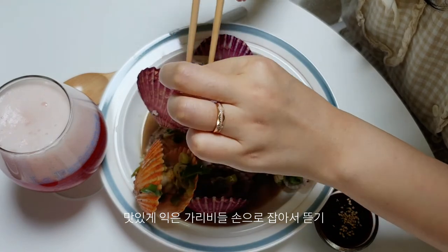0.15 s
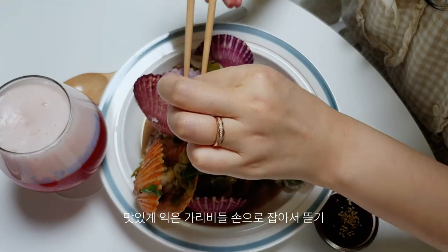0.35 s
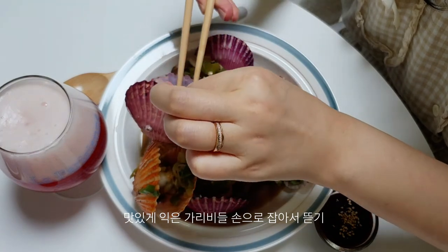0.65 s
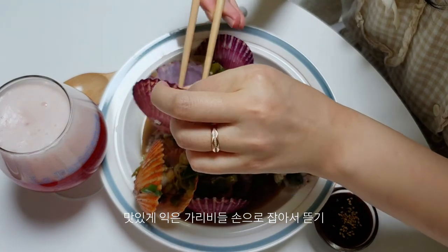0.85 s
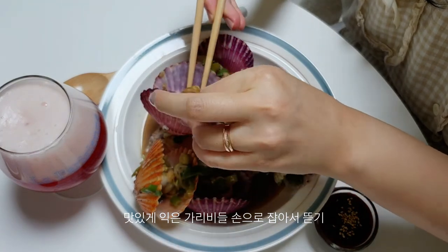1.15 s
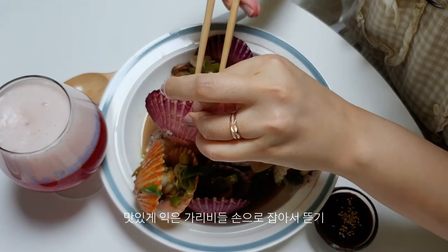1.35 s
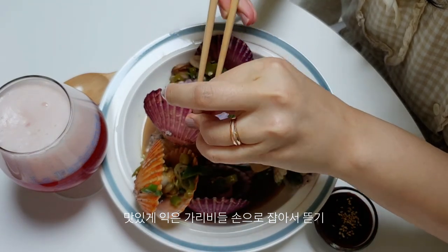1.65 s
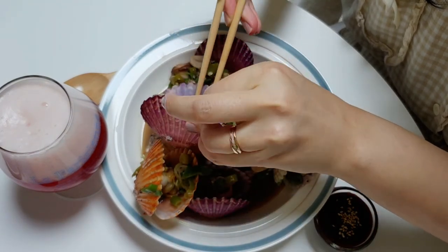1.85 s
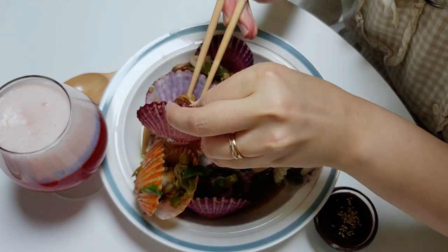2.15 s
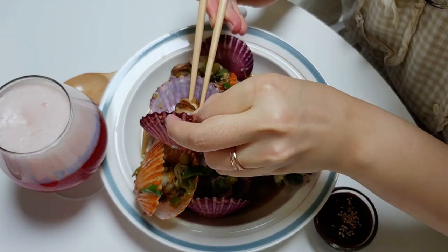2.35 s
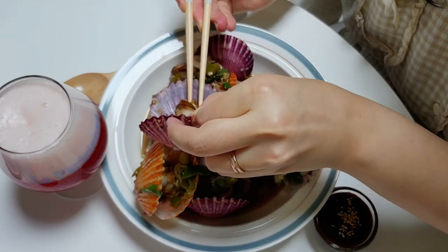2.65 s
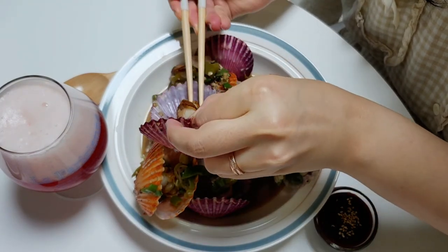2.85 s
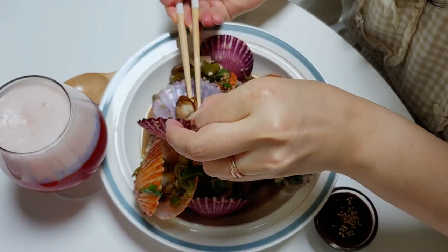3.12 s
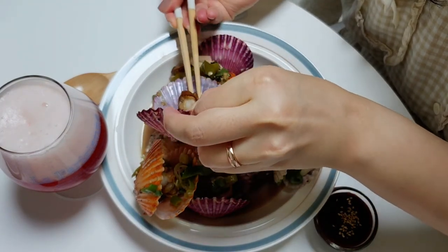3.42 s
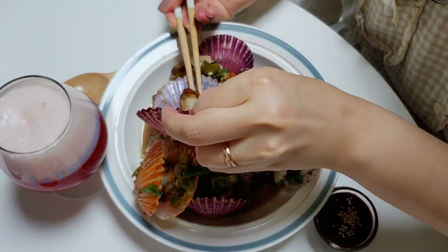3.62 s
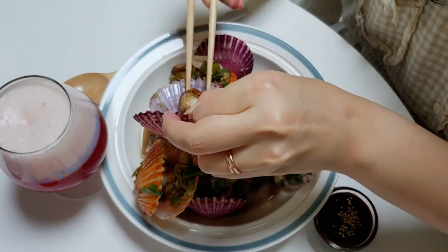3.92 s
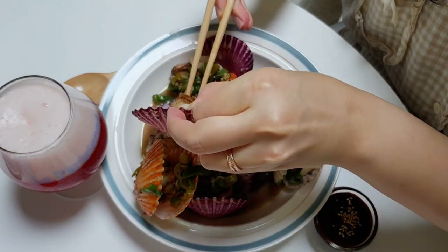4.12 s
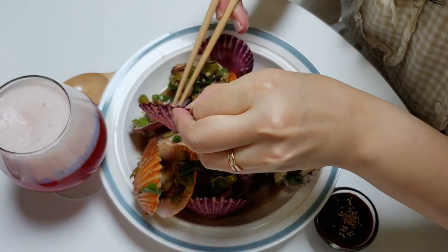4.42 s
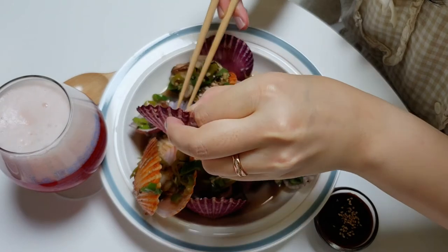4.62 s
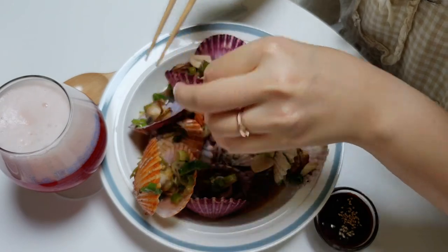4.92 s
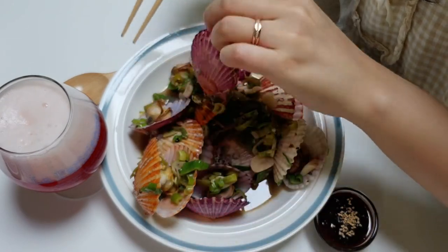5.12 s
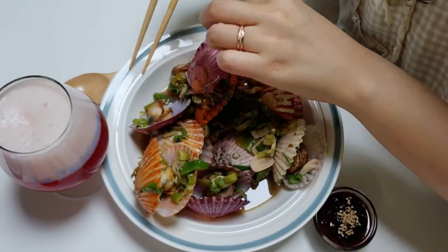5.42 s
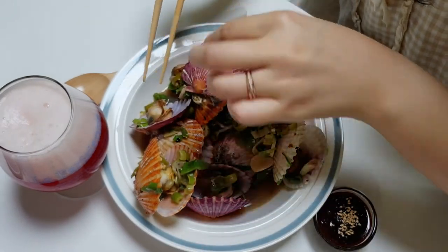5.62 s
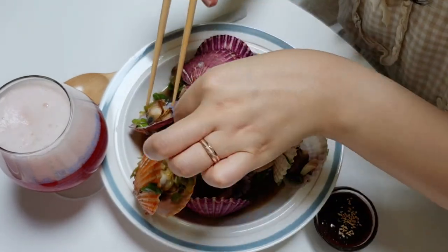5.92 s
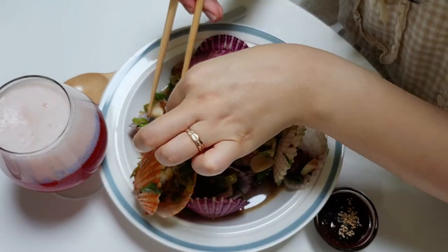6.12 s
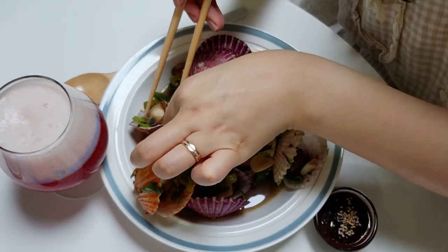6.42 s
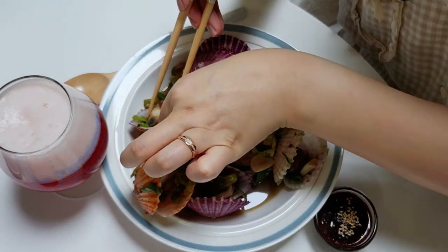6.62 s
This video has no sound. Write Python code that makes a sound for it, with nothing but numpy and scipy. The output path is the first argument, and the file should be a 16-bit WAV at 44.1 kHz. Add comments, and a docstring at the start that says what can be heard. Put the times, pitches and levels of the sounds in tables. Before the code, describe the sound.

Scallop shells tick, scrape and clack on a ceramic plate as chopsticks and fingers pick through them in a quiet room.

```python
"""Scallop shells tick, scrape and clack as chopsticks and fingers pick through them on a ceramic plate.
Each blow is a short crack that rings a shell's modes; firmer ones also knock the plate on the table.
Ribbed rims stick and slip as they slide, and a lifted shell gives one faint squeak.
The stereo microphone is close, the small room answers briefly, and an appliance hums faintly in it."""
import sys
import numpy as np
from scipy import signal
from scipy.fft import rfft, irfft, next_fast_len
from scipy.io import wavfile
from scipy.ndimage import map_coordinates

SR = 44100
rng = np.random.default_rng(int(sys.argv[2]) if len(sys.argv) > 2 else 0)


def bounce(signal):
    """Save signal as a 16-bit WAV file at the path given by the first command-line argument."""
    frames = np.transpose(np.atleast_2d(signal))
    limited = np.clip(frames, -1, 1)
    pcm = np.round(limited * 32767).astype(np.int16)
    wavfile.write(sys.argv[1], SR, pcm)


N = 298116
TIME = np.arange(N) / SR
BLOW_TIME = np.arange(SR // 7) / SR


def amp(db):
    """Decibels to gain."""
    return 10 ** (np.asarray(db) / 20)


def unit(x, size=None):
    """Scale to rms 1 over the first size samples."""
    return x / np.sqrt(np.mean(x[..., :size] ** 2) + 1e-20)


def along(points, hz):
    """Read a curve of (Hz, value) points on a log frequency axis."""
    point_hz, values = np.transpose(points)
    return np.interp(np.log(hz + 1), np.log(point_hz), values)


def wobble(rate):
    """A smooth random curve, rate knots a second."""
    return map_coordinates(rng.standard_normal(int(N * rate / SR) + 4), [TIME * rate])


def filtered(x, response):
    """Equalise x with a gain given as a function of Hz."""
    size = next_fast_len(N + SR // 4)
    return irfft(rfft(x, size) * response(np.fft.rfftfreq(size, 1 / SR)), size)[..., :N]


def band(x, edges):
    """Causal band-pass."""
    return signal.sosfilt(signal.butter(3, edges, 'band', fs=SR, output='sos'), x)


def stereo_noise(size, apart):
    """A common noise plus a share that differs at each microphone."""
    return unit(rng.standard_normal(size) + apart * rng.standard_normal((2, size)))


def add(track, start_s, x):
    """Mix x into the track at start_s."""
    part = track[:, max(round(start_s * SR), 0):][:, :x.shape[1]]
    part += x[:, :part.shape[1]]


# The appliance's partials. Each row: frequency in Hz, level in dB.
HUM_PARTIALS = [(59.2, -74), (177.6, -88.5), (559.9, -89.5), (646, -79), (1351, -101), (2013, -99)]
# Swells of the low drone. Each row: peak time in seconds, half width in seconds, level in dB.
DRONE_SWELLS = [(3.321, 0.072, -62.5), (4.08, 0.076, -68.5), (4.87, 0.067, -70.5), (5.28, 0.072, -68)]
# Spectra of the rumble and the hiss. Each row: frequency in Hz, relative density in dB.
RUMBLE_SPECTRUM = [(15, -47), (27, -26.5), (38, -15.5), (52, -7.5), (85, 0), (124, 1.5), (156, -11),
                   (240, -9), (300, -35.5), (500, -69)]
HISS_SPECTRUM = [(120, -31), (250, -18.5), (330, -19.5), (430, -16.5), (560, -13), (650, -8.5),
                 (720, -18.5), (950, -26.5), (1550, -30), (1950, -24), (2500, -30.5), (6000, -36),
                 (13000, -36), (16000, -36.5)]

def room_tone(drone_hz=118.4, drone_db=-77, rumble_db=-70, hiss_db=-77):
    """A slightly unsteady appliance hum, a low drone that swells now and then, rumble and faint hiss."""
    hum = sum(amp(db + 2.1 * wobble(3.8)) * np.sqrt(2) * np.sin(2 * np.pi * hz * TIME + 0.21 * wobble(4))
              for hz, db in HUM_PARTIALS)
    swells = sum(amp(db) * np.exp(-((TIME - peak) / width) ** 2) for peak, width, db in DRONE_SWELLS)
    drone_gain = amp(drone_db + wobble(4.2)) + swells
    drone = drone_gain * unit(np.sin(2 * np.pi * drone_hz * TIME + 0.78 * wobble(12)))
    rumble = unit(filtered(stereo_noise(N, apart=0.34), lambda hz: amp(along(RUMBLE_SPECTRUM, hz))))
    rumble *= amp(rumble_db + 1.03 * wobble(4))
    hiss = unit(filtered(stereo_noise(N, apart=2.8), lambda hz: amp(along(HISS_SPECTRUM, hz))))
    return hum + drone * amp([[1.5], [-1.5]]) + rumble + amp(hiss_db) * hiss


# The room's tail. Each row: frequency in Hz, t60 in seconds.
ROOM_DECAY = [(150, .27), (600, 0.3), (2000, 0.18), (5000, 0.19), (9000, 0.13), (16000, .25)]
# Stereo width of the echoes. Each row: frequency in Hz, side to mid ratio.
ROOM_WIDTH = [(250, 0.16), (600, 0.39), (1500, 1)]

def in_room(x, early_db, tail_db):
    """The direct sound, a quick flurry from the table and nearby walls, and the room's weak tail."""
    hz, frame_s, spectra = signal.stft(rng.standard_normal((2, SR // 3)), SR, nperseg=256)
    tail = signal.istft(spectra * amp(-60 * frame_s / along(ROOM_DECAY, hz)[:, None]), SR, nperseg=256)[1]
    t = np.arange(tail.shape[1]) / SR
    onset = 1 - np.exp(-(t / 0.0043) ** 2)
    early = rng.standard_normal(tail.shape) * amp(-60 * t / 0.065)
    echoes = amp(early_db) * unit(early * onset) + amp(tail_db) * unit(tail * onset)
    mid, side = echoes / np.sqrt(2 * len(t))
    # long waves reach both microphones alike
    side = irfft(rfft(side) * along(ROOM_WIDTH, np.fft.rfftfreq(len(t), 1 / SR)), len(t))
    response = np.array([mid + side, mid - side])
    response[:, 0] = 1  # direct sound
    return signal.fftconvolve(x, response, axes=1)


def placed(x, pan_db, lead_samples=6):
    """The plate is nearer the left microphone: louder and earlier there."""
    left, right = np.pad(x[0], (0, lead_samples)), np.pad(x[1], (lead_samples, 0))
    return np.array([left, right]) * amp([[pan_db / 2], [-pan_db / 2]])


def squeak(start=5.245, length=0.058, pitch_hz=8300, db=-87):
    """A thin, faint squeak while the lifted shell is held."""
    progress = np.clip((TIME - start) / length, 0, 1)
    envelope = np.clip(2 * np.sin(np.pi * progress), 0, 1)
    return amp(db) * envelope * unit(np.sin(2 * np.pi * pitch_hz * TIME + 1.2 * wobble(400)))


def ring(modes, detune, spread):
    """Damped modes at new strengths for each blow; each microphone hears its own phase."""
    hz, db, t60 = np.transpose(modes)[:, :, None]
    hz = hz * np.exp(detune * rng.standard_normal(hz.shape))
    phase = rng.uniform(0, 2 * np.pi, hz.shape) + spread * rng.standard_normal((2, len(hz), 1))
    envelope = amp(db + 2 * rng.standard_normal(hz.shape) - 60 * BLOW_TIME / t60)
    return unit((envelope * np.sin(2 * np.pi * hz * BLOW_TIME + phase)).sum(axis=1), size=220)


# Modes of the loaded plate on the table. Each row: frequency in Hz, relative level in dB, t60 in seconds.
PLATE_MODES = [(175, -6.5, 0.12), (213.9, -3.5, 0.11), (394, -3, 0.065), (482, -3.5, 0.066),
               (533.2, 1.5, 0.063), (670, -6, 0.03), (751, -4.5, 0.06), (861, 0.5, 0.039),
               (1060, -3.5, 0.047)]
# The five registers: plate, clack, hollow, ring, tick. Each row: low edge in Hz, high edge in Hz.
REGISTERS = [(150, 1100), (1200, 1900), (1900, 2900), (2900, 5000), (5200, 16000)]

def strike(modes, ring_db):
    """One blow in five registers: the plate's knock, then a hard crack with the modes' short ring."""
    burst = stereo_noise(len(BLOW_TIME), apart=1) * amp(-60 * BLOW_TIME / 0.018)
    crack = unit(burst * (1 - np.exp(-BLOW_TIME / 0.000067)), size=220)
    shell = crack + amp(ring_db) * ring(modes, detune=0.008, spread=0.91)
    plate = ring(PLATE_MODES, detune=0.021, spread=0.097) * (1 - np.exp(-BLOW_TIME / 0.0025))
    knock = unit(band(plate + amp(-7.5) * crack, REGISTERS[0]), size=800)
    return [knock] + [unit(band(shell, edges), size=220) for edges in REGISTERS[1:]]


def tilted(db_per_octave, pivot):
    """Register levels in dB, tilted about the pivot register: the harder the contact, the brighter."""
    octaves = np.log2(np.prod(REGISTERS, axis=1)) / 2
    return db_per_octave * (octaves - octaves[pivot])


# Resonances of a rubbed rim. Each row: frequency in Hz, relative level in dB, t60 in seconds.
RIM_MODES = [(1165, -5, .03), (1830, -3.5, 0.014), (2098, 0, .015), (2370, -0.5, 0.017), (3730, -7.5, .02),
             (4550, -5, 0.0067), (5400, -11.5, 0.0073), (6540, -2, 0.025), (8600, -8.5, 0.014)]
# Tone of a scrape: an offset in dB for each register, low to high.
SCRAPE_COLOUR = (-1.5, -0.1, 2.5, -3.5, -1.27)
# Shells sliding. Each row: start and end in seconds, level in dB, brightness in dB per octave,
# swell over the stroke in dB.
SCRAPES = [(0, 0.174, -83, 1.5, -18), (0.508, 0.564, -68.5, -2, -13.5), (0.644, 0.703, -67.5, -2, 0),
           (0.743, 0.797, -55, -3, 12.5), (0.812, 0.838, -65, 4, -17), (0.894, 0.993, -83.5, 5.5, -18),
           (1.22, 1.28, -73, 5.5, 40), (1.753, 1.906, -85.5, 2.5, -3), (2.631, 2.764, -89, 6.5, -9),
           (3.078, 3.093, -71, 14.5, 25), (3.973, 4.005, -47.5, 3.5, -2.5), (3.999, 4.116, -50, 2, 7),
           (4.162, 4.242, -49, -1.8, 0), (5.11, 5.163, -60, -0.9, -3.5), (6.176, 6.203, -61.5, -0.5, -8.5),
           (6.354, 6.425, -74, -1.6, 3), (6.682, 6.763, -76, -1.5, -4.5)]

def scraping(slips_per_s=480, uneven_db=1.5, fade_s=0.0059):
    """A ribbed rim sticks and slips: a run of tiny uneven blows into the rim and the plate."""
    out = np.zeros((2, N))
    for start, end, level_db, brightness, swell_db in SCRAPES:
        register_db = level_db + np.array(SCRAPE_COLOUR) + tilted(brightness, pivot=2)
        register_db[2] += 2 * max(-brightness, 0)  # a dull, heavy rub sets the shell's hollow ringing
        t = np.arange(max(round((end - start) * SR), 300)) / SR
        slips = (rng.random(len(t)) < slips_per_s / SR) * amp(uneven_db * rng.standard_normal(len(t)))
        pressure = amp(swell_db * t / t[-1]) * np.clip(np.minimum(t, t[-1] - t) / fade_s, 0, 1)
        friction = (slips + 0.04016 * rng.standard_normal(len(t))) * pressure
        registers = [unit(signal.fftconvolve(friction[None], part, axes=1), size=len(t))
                     for part in strike(RIM_MODES, ring_db=-2.5)]
        rasp = sum(amp(db) * part for db, part in zip(register_db, registers))
        add(out, start, amp(-4) * in_room(placed(rasp, pan_db=3), early_db=-5, tail_db=-12))
    return out


# Modes of the shells. Each row: frequency in Hz, relative level in dB, t60 in seconds.
SHELL_MODES = [(1444, 0.5, 0.024), (1573, -5, .04), (1795, -8, 0.032), (2230, -0.5, .04),
               (2309, -4.5, 0.055), (2626, -0.5, 0.023), (2900, -9.5, 0.013), (3596, 2, 0.019),
               (4078, -4, .035), (4780, 1.5, 0.0086), (5280, -13, 0.035), (7383, -8, .05),
               (10400, -6.5, 0.036), (11980, -2, .03)]

def contact(register_db, ping_hz, t60, pan_db, firm_db=-13.5):
    """One hit knocks the plate, rings the shell and brings out one of its modes as a ping."""
    knock_db, *shell_db = register_db
    knock, *registers = strike(SHELL_MODES, ring_db=-7.5)
    shell = sum(amp(db) * part for db, part in zip(shell_db, registers))
    ping_db = np.interp(ping_hz, np.mean(REGISTERS[1:], axis=1), shell_db) - 6
    damping = 1 + (ping_hz / 7000) ** 2  # high modes are weaker and die sooner
    ping = amp(ping_db) / damping * ring([(ping_hz, 0, t60 / damping)], detune=0, spread=0.6)
    blow = placed(shell + ping, pan_db) + placed(amp(knock_db - 1.5) * knock, pan_db=3)
    # light touches are screened by the hand, so more of their sound arrives by way of the room
    lightness_db = firm_db - max(shell_db)
    return amp(-1) * in_room(blow, early_db=-9, tail_db=-16 + 0.1533 * lightness_db)


# Dull knocks and light ticks. Each row: start in seconds, level in dB, strongest mode in Hz.
KNOCKS = [(0.506, -59, 490), (2.649, -73, 740), (2.728, -70, 530), (2.88, -84, 1680), (5.185, -55, 1254),
          (6.186, -54.5, 1550), (6.408, -60.5, 2290), (6.423, -52.5, 1660), (6.681, -69.5, 2600)]
TICKS = [(0.867, -72, 6600), (0.893, -65, 4200), (1.257, -65.5, 4700), (1.277, -69, 4300),
         (1.3666, -51, 2840), (1.764, -77, 8700), (2.019, -69.5, 1790), (2.1998, -67.5, 4040),
         (2.245, -73, 4120), (2.2958, -67, 4600), (2.728, -75.5, 7240), (2.9767, -67, 12200),
         (3.052, -72, 6700), (3.085, -55, 5140), (3.677, -76.5, 8800), (4.1154, -52, 8900),
         (4.176, -58.5, 12000), (4.3033, -62.5, 7400), (4.5266, -65.5, 12000), (6.035, -67.5, 7320),
         (6.691, -71, 3250), (6.747, -75.5, 3370)]
# Tone of each kind: an offset in dB for each register, low to high.
KNOCK_COLOUR = (4.5, 1, 0.5, -11, -18.5)
TICK_COLOUR = (-19.5, -9.5, -8.5, -3, 0)

def light_touches(own_register_db=7.5):
    """Shells settle on the plate, damped by the sauce; chopstick tips and shell edges tick."""
    out = np.zeros((2, N))
    for touches, colour, t60, pan_db in (KNOCKS, KNOCK_COLOUR, 0.02, 4), (TICKS, TICK_COLOUR, 0.055, 5):
        for start, level_db, ping_hz in touches:
            # a light touch favours the register of its strongest mode
            own_register = np.array([low <= ping_hz < high for low, high in REGISTERS])
            register_db = level_db + np.array(colour) + own_register_db * own_register
            add(out, start, contact(register_db, ping_hz, t60, pan_db))
    return out


# Shell on shell. Each row: start in seconds, level in dB, brightness in dB per octave,
# boost of the free ring in dB, plate knock relative to the level in dB, strongest mode in Hz.
CLACKS = [(0.6076, -62, -0.4, 3, 0.5, 2450), (0.782, -43.5, -17.5, 17.5, -4, 2420),
          (0.804, -46, 2.5, 3, -15, 1850), (3.0984, -52.5, 7, 3.5, -11, 8070),
          (3.9628, -42.5, 5, -2, -13, 7750), (4.018, -49, 1.3, 6, -15, 2200),
          (4.1086, -58, 5.5, 5, -1.5, 8400), (4.1563, -32, -2, 7, 0.5, 2400),
          (4.1936, -49, 7.5, 2, -1.5, 2193), (4.209, -40.5, 2, 7.5, -1.5, 2297),
          (4.222, -37, 1.2, 6.5, -0.5, 2250), (4.2611, -46, 0.7, -3.5, -17.5, 2300),
          (4.3134, -56, 3.5, 3.5, -2.5, 2238), (4.3246, -21.5, -2, 7.5, -13.5, 1438),
          (4.3335, -30, -0.2, -2, -7, 2192), (4.6481, -58, -14.5, 3.5, -11, 1560),
          (5.1021, -42, -0.7, -1, -10, 6340), (5.1589, -59.5, -0.5, 2.5, -17, 1310),
          (5.4459, -44, 1.5, 3.5, -15, 2350), (5.461, -35, 2, 11, -16, 2950),
          (5.473, -43, 3.5, 6, -7.5, 5090), (6.167, -51, -7, 8.5, -9, 2378)]

def clacking():
    """Shells clack together, each blow with its own hardness, free ring and knock of the plate."""
    out = np.zeros((2, N))
    for start, level_db, brightness, free_db, knock_db, ping_hz in CLACKS:
        register_db = level_db + tilted(brightness, pivot=1)
        register_db[0] = level_db + knock_db
        register_db[2:4] += free_db  # hollow and ring registers
        add(out, start, contact(register_db, ping_hz, t60=0.051, pan_db=4))
    return out


def scene():
    """Shells over the quiet room."""
    return clacking() + light_touches() + scraping() + squeak() + room_tone()


# The microphone's treble. Each row: frequency in Hz, gain in dB.
MICROPHONE_EQ = [(1000, 0), (5000, 0), (6200, -1), (7800, 3), (10500, 2.5), (13500, 3.5), (16000, -7)]

def record(dry, top_hz=16100):
    """The microphone colours the treble, and a steep low-pass cuts off the very top."""
    coloured = filtered(dry, lambda hz: amp(along(MICROPHONE_EQ, hz)))
    return filtered(coloured, lambda hz: 1 / np.sqrt(1 + (hz / top_hz) ** 200))


dry = scene()
out = record(dry)
bounce(out)
```